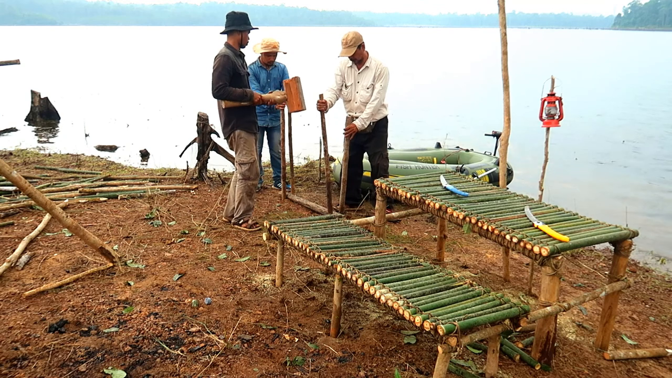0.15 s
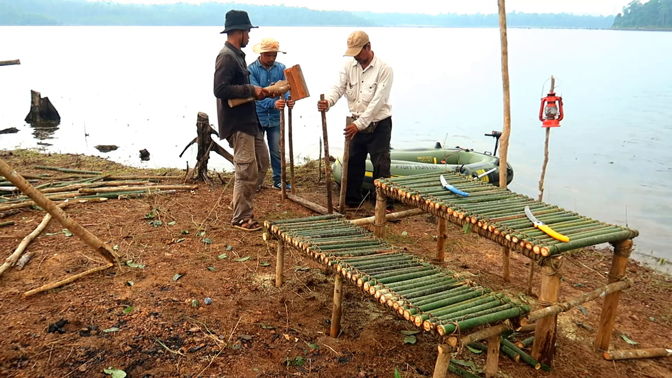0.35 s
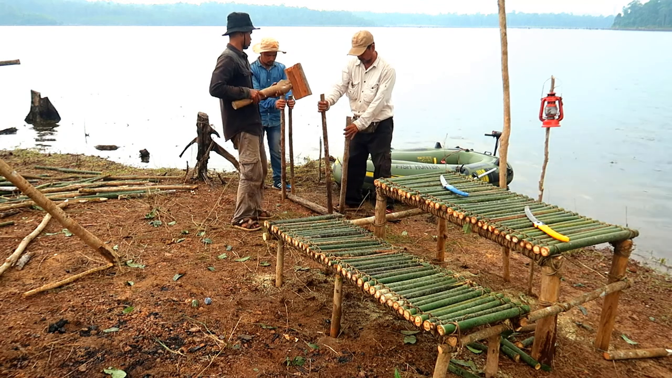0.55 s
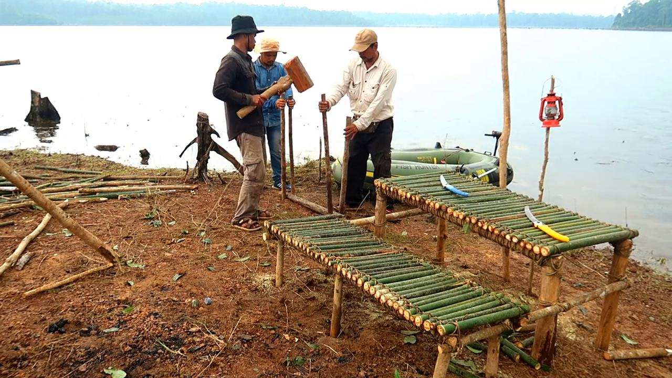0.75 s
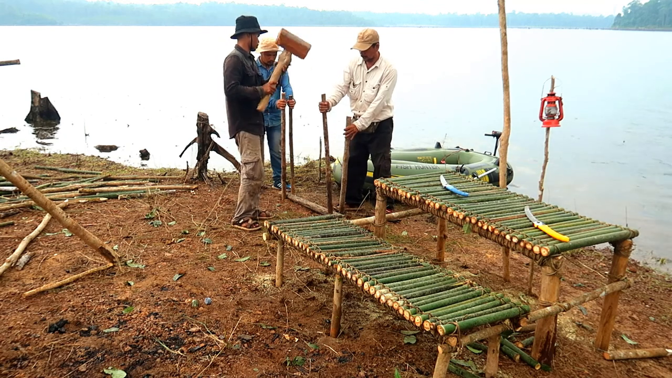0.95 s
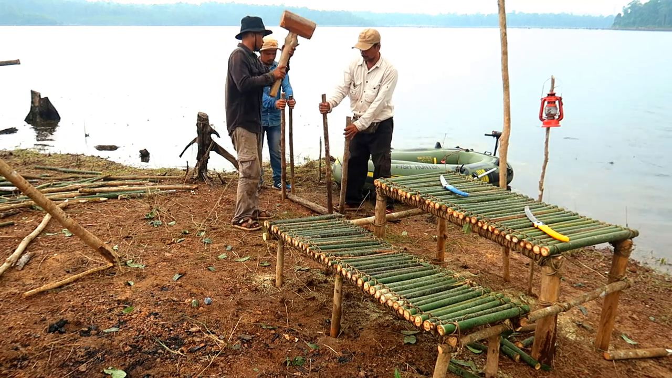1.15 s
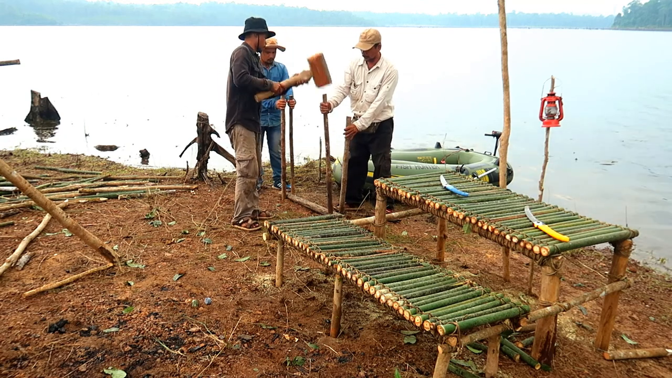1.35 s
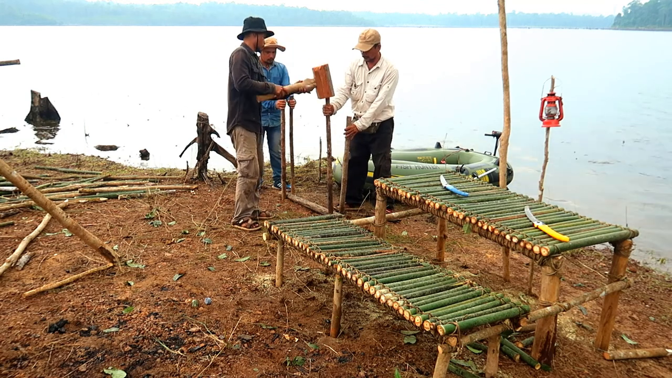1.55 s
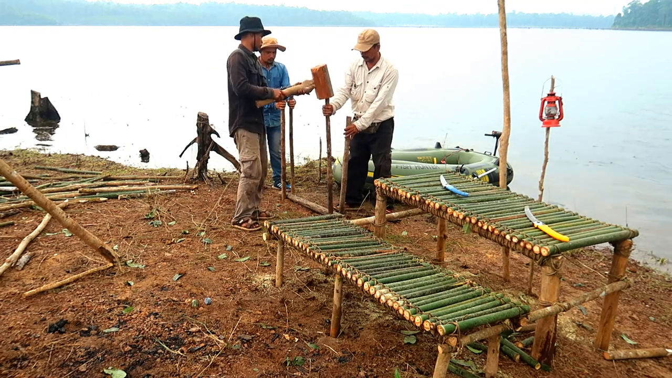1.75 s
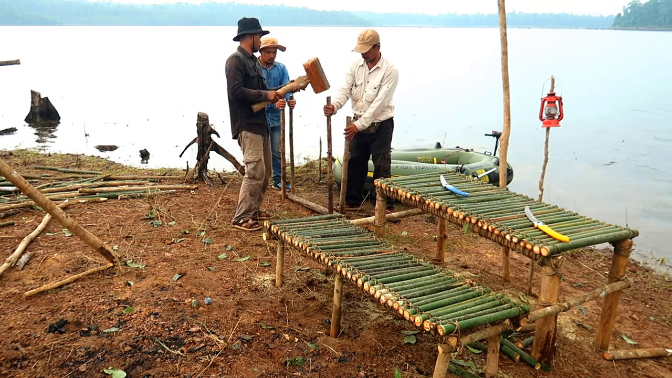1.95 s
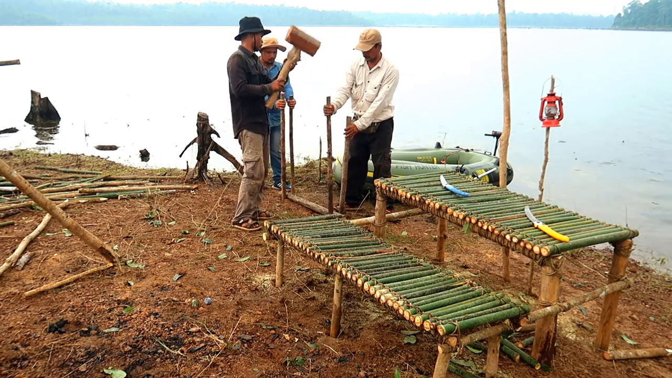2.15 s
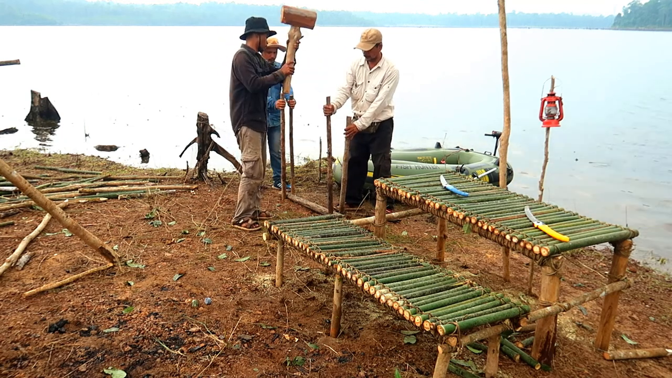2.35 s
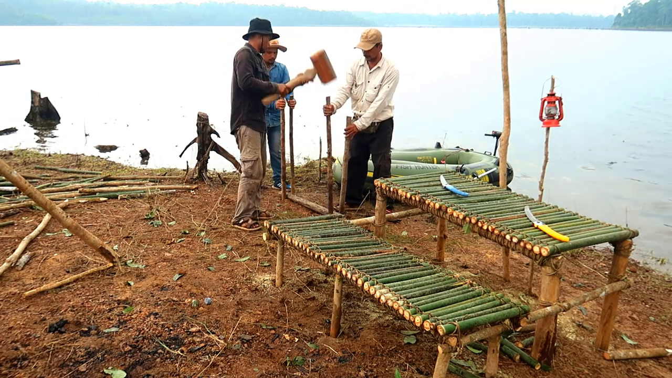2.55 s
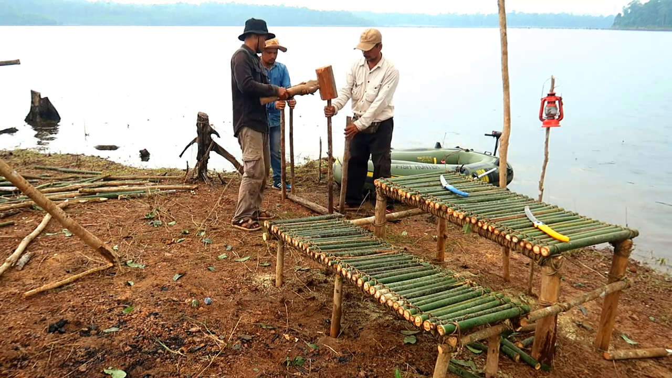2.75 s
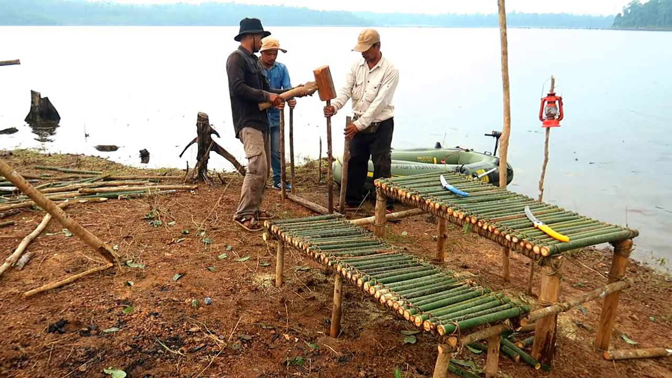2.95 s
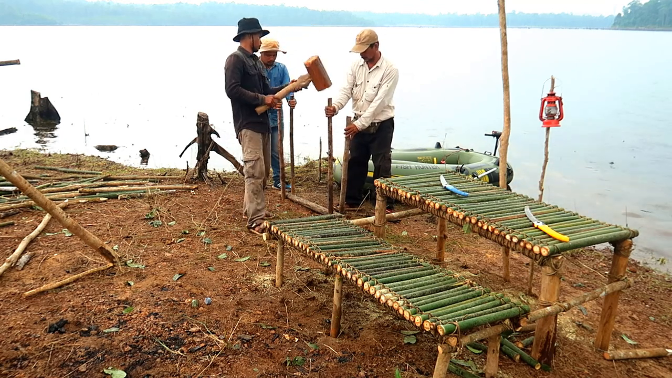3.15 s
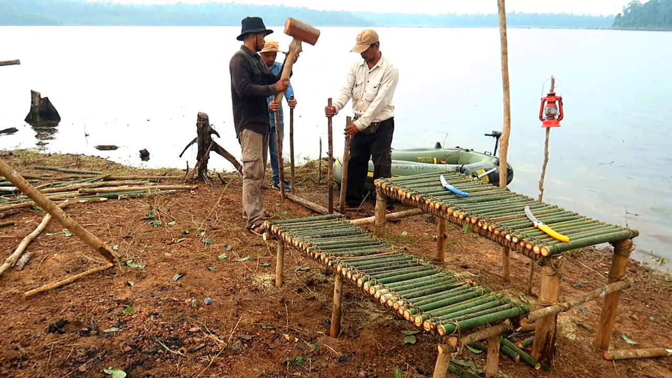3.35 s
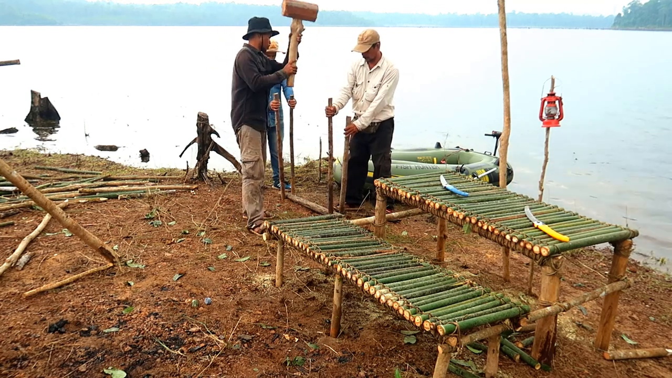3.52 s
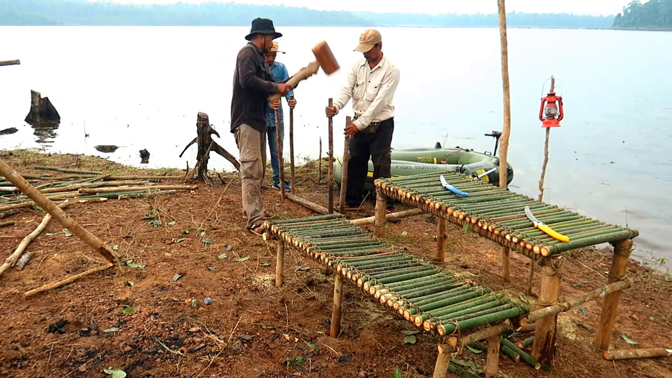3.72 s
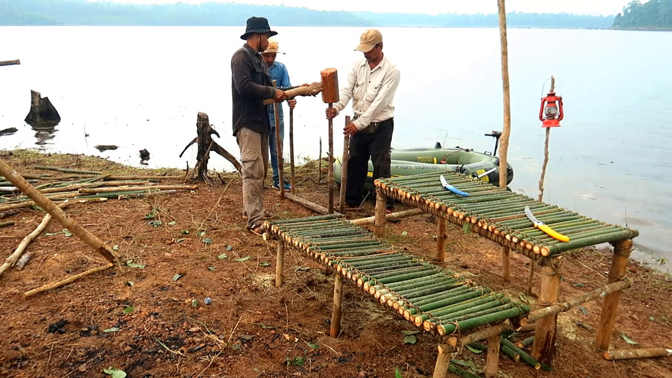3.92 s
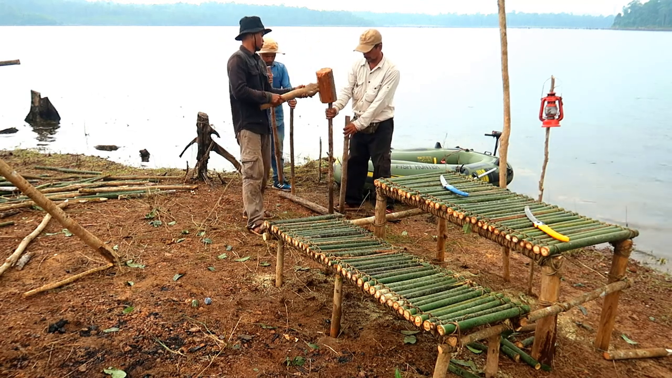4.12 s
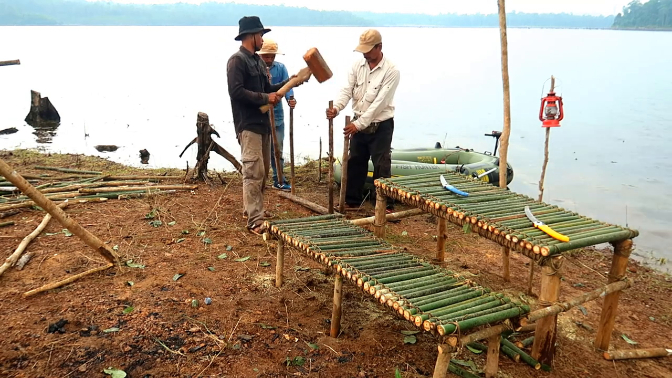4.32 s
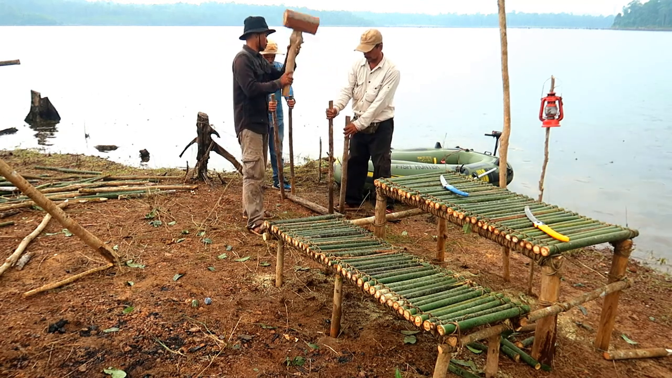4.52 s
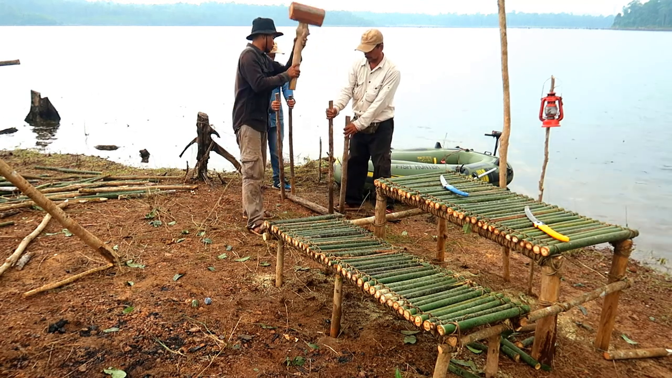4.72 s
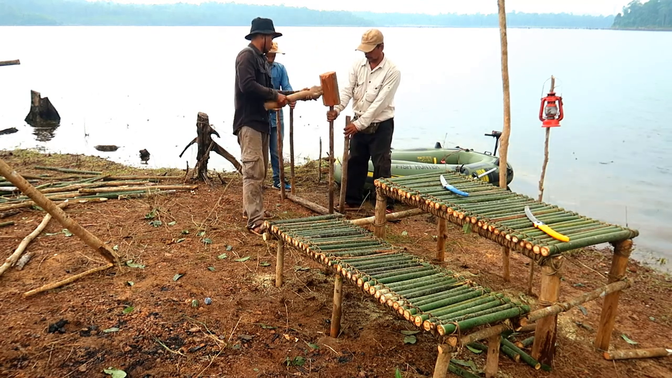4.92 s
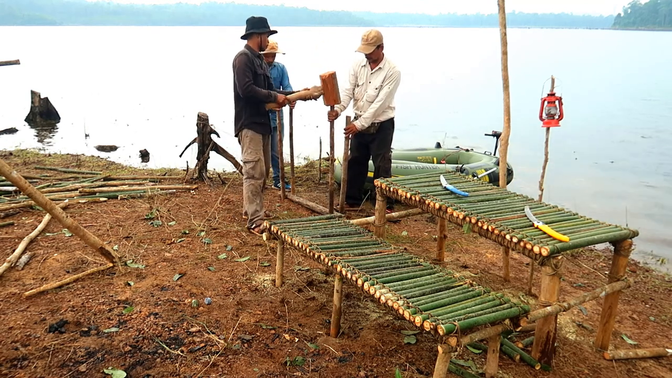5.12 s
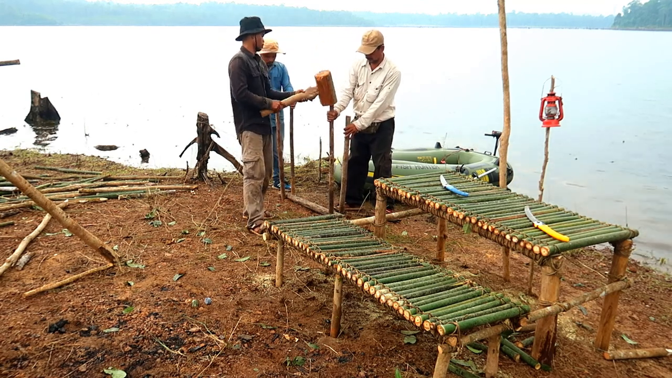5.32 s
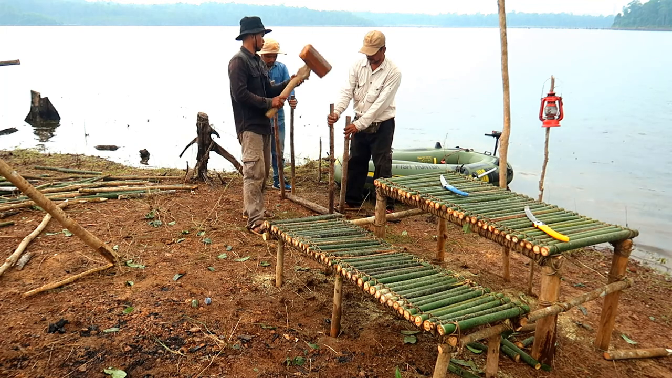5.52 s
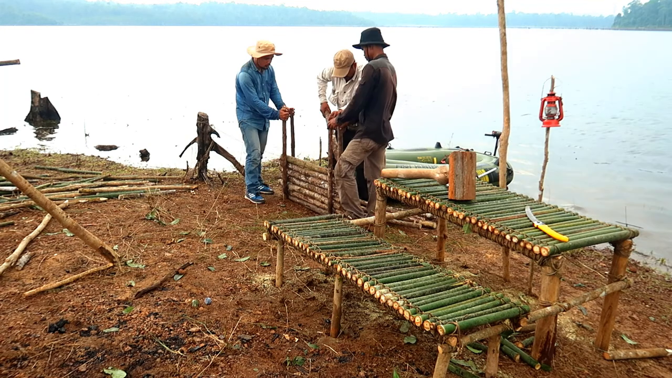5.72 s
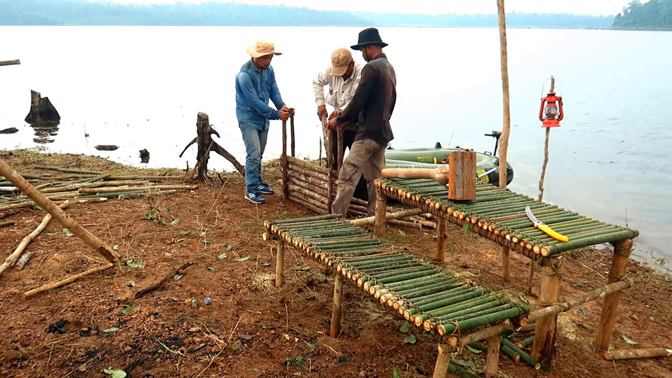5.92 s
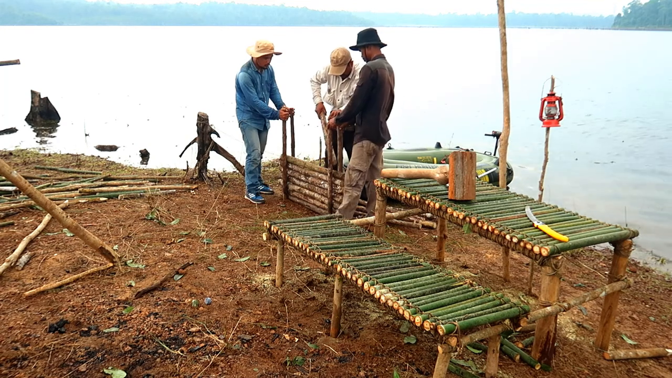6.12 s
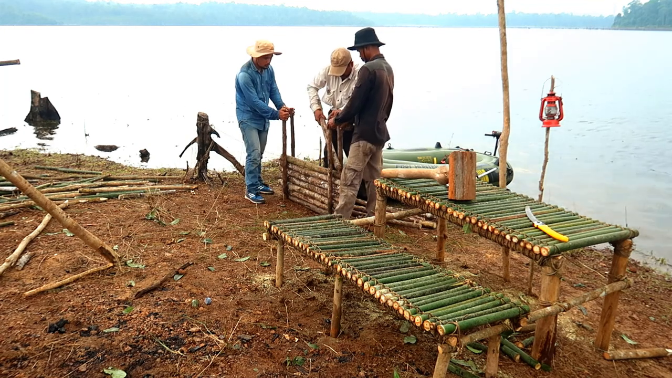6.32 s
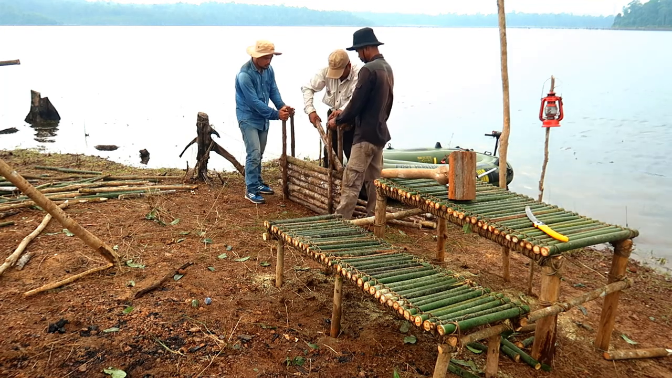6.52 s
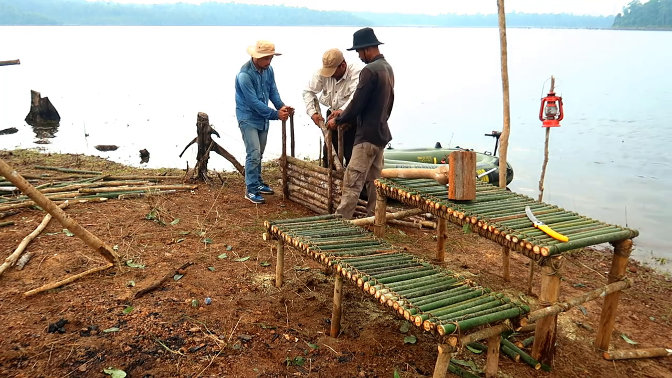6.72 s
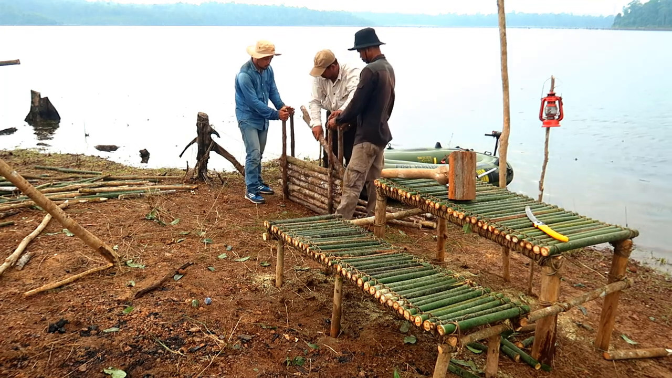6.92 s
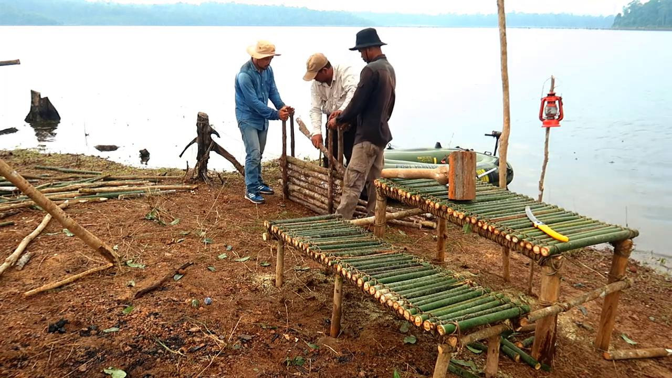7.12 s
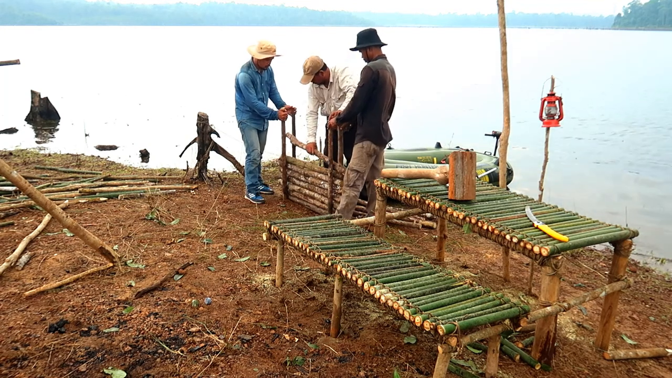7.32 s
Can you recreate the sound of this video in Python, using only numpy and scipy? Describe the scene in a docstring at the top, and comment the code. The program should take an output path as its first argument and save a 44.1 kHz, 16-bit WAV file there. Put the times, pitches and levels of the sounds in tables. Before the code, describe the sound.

A wooden mallet strikes a stake four times, about 1.2 seconds apart, each a hard, short woody crack with a low thump. A lighter glancing hit falls just before the last blow. Then a dull foot thud, shuffling, a soft hollow pole knock, scrapes and a tiny twig snap. A small bird chirps in falling runs; an insect drones over soft shore hiss. Open air, moderately close microphone.

```python
"""Driving a stake by a quiet lake

A wooden mallet drives a stake into the earth: four blows, each a burst of crushed fibres, a short push and
ringing wood, with a glancing one between the third and the fourth. Feet thud and shuffle, and poles are
knocked and rubbed into place. A small bird repeats runs of falling whistled chirps, a pulsing tone drones
like an insect, filtered noise makes the shore's hiss and the breeze's rumble, and gain control ducks
everything after loud sounds."""
import sys
import numpy as np
from scipy import signal
from scipy.fft import rfft, irfft
from scipy.io import wavfile
from scipy.ndimage import uniform_filter1d

SR = 44100
rng = np.random.default_rng(int(sys.argv[2]) if len(sys.argv) > 2 else 0)


def int16_out(signal):
    """Quantize to a 16-bit WAV file."""
    q = np.round(np.clip(np.atleast_2d(signal).T, -1, 1) * 32767)
    wavfile.write(sys.argv[1], SR, q.astype(np.int16))


N = 324752

# How alike left and right are in the open air. Each row: frequency in Hz, correlation from -1 to 1.
AIR_LIKENESS = [(50, .92), (90, 0.96), (140, 0.93), (220, 0.15), (600, -0.22), (2500, -0.19),
                (6000, -0.099), (12000, -0.16)]
# The same for scatter and close sounds. Each row: frequency in Hz, correlation from -1 to 1.
CLOSE_LIKENESS = [(100, 1), (500, 1), (1500, 1), (4000, 1), (10000, 0.5)]
# Spectrum of earth giving way. Each row: frequency in Hz, relative level in dB per Hz.
SOIL_SPECTRUM = [(40, 5), (100, 15.5), (170, 5.5), (330, -7), (600, -32), (1500, -42), (6000, -65)]


def amp(db):
    """Decibels to gain."""
    return 10 ** (np.asarray(db) / 20)


def unit(x):
    """Scales to rms 1."""
    return x / np.sqrt(np.mean(x ** 2) + 1e-20)


def read(points, hz):
    """Reads a curve of (Hz, value) points on a log-frequency axis."""
    f, value = np.transpose(points)
    return np.interp(np.log(hz + 1), np.log(f + 1), value)


def follow(curve):
    """Turns a level curve of (seconds, dB) points into a gain for every sample."""
    return amp(np.interp(np.arange(N) / SR, *np.transpose(curve)))


def add(mix, s, sound):
    """Mixes a sound in at s seconds, trimming whatever falls outside."""
    at = round(s * SR)
    sound = sound[..., max(-at, 0):]
    part = mix[:, max(at, 0):][:, :sound.shape[-1]]
    part += sound[..., :part.shape[1]]


def fade(t, t60):
    """Exponential decay by 60 dB in t60 seconds."""
    return np.exp(-np.log(1000) * t / t60)


def noise(spectrum, size, tilt=0, likeness=AIR_LIKENESS):
    """Coloured stereo noise: the shares of mid and side set how alike the channels are at each frequency."""
    hz = np.fft.rfftfreq(size, 1 / SR)
    mid, side = rfft(rng.standard_normal((2, size)))
    same = np.clip(read(likeness, hz), -.999, .999)
    opposite_signs = np.array([[1], [-1]])
    pair = mid * np.sqrt(1 + same) + opposite_signs * side * np.sqrt(1 - same)
    level_db = read(spectrum, hz) + tilt * np.log2(1 + hz / 200)
    return unit(irfft(pair * amp(level_db), size))


def tone(hz, width):
    """A narrow, wavering band of noise, at half amplitude width / 2 Hz either side of its centre."""
    f = np.fft.rfftfreq(N, 1 / SR)
    return unit(irfft(rfft(rng.standard_normal(N)) / (1 + (2 * (f - hz) / width) ** 2), N))


def pulse(spectrum, size=4096):
    """The most compact causal pulse with this spectrum (minimum phase)."""
    log_gain = np.log(amp(read(spectrum, abs(np.fft.fftfreq(size, 1 / SR)))))
    minimum_phase = np.exp(np.conj(signal.hilbert(log_gain)))
    return np.fft.ifft(minimum_phase).real[:size // 2]


def ring(modes, pitch, rise, t):
    """Damped modes; along a pole, neighbouring modes swing in opposite senses."""
    longest_cycles = 28  # caps each t60, counted at the mode's frequency before the pitch factor
    swing = 0
    for k, (hz, db, t60) in enumerate(modes):
        decay = fade(t, min(t60, longest_cycles / hz))
        swing = swing + (-1) ** k * amp(db) * decay * np.sin(2 * np.pi * hz * pitch * t)
    return swing * (1 - np.exp(-t / rise))


def outdoors(sound, delay=0.0023):
    """Adds the short scatter of an open place: noise that swells within milliseconds and dies band by band."""
    # Scatter from the ground, benches and people. Each row: frequency in Hz, relative level in dB.
    scatter_spectrum = [(60, -10.5), (130, -23), (300, -25), (600, -10.5), (1200, -16), (2000, -12),
                        (3300, -12.5), (6000, -12), (12000, -14.5)]
    # How long the scatter lasts. Each row: frequency in Hz, t60 in seconds.
    scatter_t60 = [(70, 0.24), (200, 0.19), (600, 0.12), (2500, 0.115), (5000, 0.084), (12000, 0.038)]
    white = noise([(20, 0), (20000, 0)], size=SR // 2, likeness=CLOSE_LIKENESS)
    hz, t, bands = signal.stft(white, SR, nperseg=256)
    t60 = read(scatter_t60, hz)[:, None]
    unit_energy = np.sqrt(2 * np.log(1000) / (t60 * SR))
    bands = bands * fade(t, t60) * amp(read(scatter_spectrum, hz))[:, None] * unit_energy
    tail = signal.istft(bands, SR, nperseg=256)[1]
    tail *= 1 - np.exp(-(np.arange(tail.shape[1]) / SR / delay) ** 2)
    tail[:, 0] += 1  # direct sound
    return signal.fftconvolve(np.atleast_2d(sound), tail, axes=1)


def place(pair, lag, right_db):
    """Direction: delays the left channel by lag seconds and makes the right one right_db louder than it."""
    spectra = rfft(pair)
    spectra[0] *= np.exp(-2j * np.pi * np.fft.rfftfreq(N, 1 / SR) * lag)
    return irfft(spectra, N) * amp([[-right_db / 2], [right_db / 2]])


def hiss(level_db=-56, swell_db=-0.5):
    """Water and trees: steady, wide noise whose loudness slowly swells."""
    # Spectrum of the shore. Each row: frequency in Hz, relative level in dB per Hz.
    shore_spectrum = [(59, -32.5), (100, -2), (123, -9), (353, -11.5), (425, -11.5), (592, -16.5),
                      (824, -16), (1730, -20), (2680, -22.5), (2910, -23), (4130, -27), (5190, -28),
                      (5870, -30), (11600, -39), (14000, -64)]
    swell = amp(swell_db * tone(hz=0.77, width=4.0))
    return amp(level_db) * noise(shore_spectrum, size=N) * swell


def breeze(gust_db=1.55):
    """Wind at the microphone: low rumbling noise that follows the gusts and flutters quickly on top."""
    # Strength of the breeze before the flutter. Each row: time in seconds, level in dB.
    strength = [(0, -49.5), (.72, -54), (.95, -41.5), (1.1, -57), (1.85, -47), (2.1, -54), (2.56, -46),
                (3.1, -57), (4.55, -51), (4.8, -63), (5.55, -65.5), (5.8, -49), (6.7, -52), (7.36, -66)]
    # Spectrum of the rumble. Each row: frequency in Hz, relative level in dB per Hz.
    rumble_spectrum = [(15, -8), (30, -1), (52, 3), (80, -1), (120, -25), (200, -29.5), (400, -76)]
    flutter = amp(gust_db * tone(hz=6, width=4.3))
    return follow(strength) * flutter * noise(rumble_spectrum, size=N)


def throb(per_s=7.3, uneven=0.386, wander_db=2.0, dip_db=-5):
    """The insect's pulsing: a wandering loudness with a short dip after each uneven pulse."""
    beats = np.cumsum(per_s * (1 + uneven * tone(hz=1, width=5))) / SR
    return amp(wander_db * tone(hz=1, width=24) + dip_db * np.sin(np.pi * beats) ** 4)


def insect(level_db=-2, overtone_db=-13, pitch_hz=2818, waver_hz=12):
    """A droning insect: a wavering, pulsing sine plus a narrow band of noise an octave above."""
    # The drone's course, before level_db trims it. Each row: time in seconds, level in dB.
    course = [(0, -65.5), (.8, -65.5), (2.2, -69), (2.6, -65), (3.2, -68), (4.6, -67.5), (5.3, -74.5),
              (7.36, -81.5)]
    turns = np.cumsum(pitch_hz + waver_hz * tone(hz=1, width=86)) / SR
    voice = unit(np.sin(2 * np.pi * turns) * throb())
    voice = voice + amp(overtone_db) * tone(2 * pitch_hz, width=110)
    return amp(level_db) * follow(course) * voice


def far_hums():
    """Faint far-off hums: narrow bands of noise."""
    # Each row: frequency in Hz, width in Hz, level in dB.
    hums = [(350.6, 13, -78.5), (603.5, 43, -72)]
    return sum(amp(db) * tone(hz, width) for hz, width, db in hums)


def chirp(start_hz, end_hz, length):
    """A gliding whistle that swells quickly, loudest a quarter of the way in, and dies away."""
    u = np.linspace(0, 1, round(length * SR))
    hz = start_hz + (end_hz - start_hz) * u
    whistle = np.sin(2 * np.pi * np.cumsum(hz) / SR)
    return outdoors(np.sin(np.pi * np.sqrt(u)) ** 2 * whistle)


def birds(top_hz=5530, fall_hz=800, length=0.029, gap=.0505, softer_db=7, lower_hz=12,
          lead_gap=.028, lead_db=-4.5, last_db=-56.5):
    """Each run opens with two quick, faint notes, then its falling chirps grow louder and higher."""
    # Each row: time of the last chirp's peak in seconds, number of chirps.
    runs = [(.141, 4), (.958, 4), (1.831, 4), (2.654, 5), (3.473, 4), (4.395, 4), (5.292, 4), (6.206, 4),
            (7.073, 4)]
    # Faint gliding peeps. Each row: start in seconds, level in dB, start in Hz, end in Hz, length in seconds.
    peeps = [(5.192, -55.5, 1420, 1240, 0.023), (5.251, -62.5, 2850, 3470, .035),
             (5.381, -60, 2505, 3920, .042)]
    out = np.zeros((2, N))
    for s, count in runs:
        for back in range(round(count)):  # from the last chirp back to the first
            hz = top_hz - lower_hz * back ** 2 + rng.normal(0, 20)
            start = s - back * gap - length / 4
            note = amp(last_db - softer_db * (back / count) ** 2) * chirp(hz, hz - fall_hz, length)
            add(out, start, note)
        for lead in range(1, 3):  # faint copies ahead of the first chirp
            add(out, start - lead * lead_gap, amp(lead * lead_db) * note)
    for s, db, *glide in peeps:
        add(out, s, amp(db) * chirp(*glide))
    return out


def rub(db, rise, peak_db, t60, tilt, hz, t, grain_db=1.0, sharpness=16):
    """Uneven grains of friction swell and die, coloured by one resonance of the rubbed wood."""
    # Spectrum of bark, before the tilt. Each row: frequency in Hz, relative level in dB per Hz.
    bark_spectrum = [(100, 0), (400, 9.5), (900, 3), (1500, -1), (3000, 1), (5000, -4), (9000, -8),
                     (14000, -23)]
    roughness = unit(uniform_filter1d(rng.standard_normal(len(t)), size=60))
    grains = unit(amp(grain_db * roughness))
    friction = grains * noise(bark_spectrum, size=len(t), tilt=tilt, likeness=CLOSE_LIKENESS)
    resonance = signal.lfilter(*signal.iirpeak(hz, sharpness, SR), friction)
    friction = friction + (amp(peak_db) - 1) * resonance
    return amp(db) * unit(friction) * np.minimum(t / rise, 1) * fade(np.maximum(t - rise, 0), t60)


def rubs(strokes, rise, peak_db):
    """Lays out strokes of friction that share one rise in seconds and one height of resonance."""
    out, t = np.zeros((2, N)), np.arange(SR // 2) / SR
    for s, db, *stroke in strokes:
        add(out, s, rub(db, rise, peak_db, *stroke, t))
    return out


def scrapes():
    """Wood rubbing on wood and soil: friction that swells, then dies away."""
    # Each row: start in seconds, level in dB, t60 in seconds, tilt in dB per octave, resonance in Hz.
    strokes = [(.09, -56, 0.42, -2.5, 3380), (0.595, -54, 0.12, -3.5, 3320), (4.508, -44, 0.14, -2.5, 2420),
               (5.988, -48, 0.12, -4.5, 430), (6.15, -53.5, 0.15, -2.5, 1440), (6.352, -53, 0.074, -4, 505),
               (6.42, -49.5, 0.11, -1.5, 1420), (6.888, -47, 0.25, -1.5, 434),
               (6.975, -54.5, 0.78, -2.5, 465)]
    return rubs(strokes, rise=0.023, peak_db=12.5)


def mallet(crush_db=-21, crush_t60=0.03, crush_rise=0.0005, push_db=23, push_delay=0.00163):
    """Each blow crushes fibres, pushes the stake and rings the wood; the spot it lands on sets the colour."""
    # Each row: start in seconds, level in dB, pitch factor, then the colour as dB of thud, hollow ring,
    # tock, clack, rap, crack and fizz.
    blows = [(1.4745, 0.5, 1.01, 2.5, 4, 2.5, 5, 1, 8.5, -1),
             (2.6806, 5, 0.97, 3.1, 0.1, -1.5, 3, -2.7, -6.5, -3.8),
             (3.8539, 5, .99, 6.8, -0.5, -9, 4, -1.8, 1.5, -5),
             (4.9734, 5, 0.97, 7.7, 0.5, 1, 1, 0.34, -4, -6.5)]
    # Where these seven colours lie, in Hz.
    colour_hz = [300, 560, 950, 1450, 2100, 3200, 5500]
    # Mallet, stake and the earth under it ringing together, before the pitch factor and colour.
    # Each row: frequency in Hz, level in dB, t60 in seconds.
    wood_modes = [(52.5, -40.5, 0.26), (73, -50, 0.2), (143.4, -26, 0.075), (219.3, -19.5, 0.033),
                  (313, -16.5, 0.031), (381, -14.5, 0.041), (538, -11.5, 0.045), (596, -9.5, 0.024),
                  (726, -18.5, 0.063), (790, -46, 0.023), (960, -23, 0.068), (1115, -11, 0.055),
                  (1434, -15.5, .03), (1565, -29.5, 0.028), (2076, -11, 0.025), (2670, -20.5, 0.021),
                  (3150, -29.5, 0.0048), (4300, -31.5, 0.005)]
    # Fibres crushing under the mallet face. Each row: frequency in Hz, relative level in dB per Hz.
    crush_spectrum = [(200, -12.5), (800, 1.5), (1750, -2), (2300, 0.5), (3200, -3), (4000, -7.5),
                      (6500, -8), (8000, -19), (11000, -26), (14000, -42.5)]
    # The short push of the mallet head. Each row: frequency in Hz, relative level in dB.
    push_spectrum = [(40, -26), (90, -18.5), (160, 1), (320, 1), (480, -25.5), (800, -0.5), (1050, 3),
                     (1300, -8), (1800, -23), (3000, -25), (8000, -41), (14000, -57.5)]
    out, t = np.zeros((2, N)), np.arange(SR // 4) / SR
    for s, db, pitch, *colour in blows:
        grit = noise(crush_spectrum, size=len(t), likeness=CLOSE_LIKENESS)
        blow = grit * amp(crush_db) * fade(t, crush_t60) * (1 - np.exp(-t / crush_rise))
        blow += ring(wood_modes, pitch, t=t, rise=0.0013)
        add(blow, push_delay, amp(push_db) * pulse(push_spectrum))
        spot = pulse(list(zip(colour_hz, colour)))
        blow = signal.fftconvolve(blow, spot[None], axes=1)
        add(out, s, amp(db) * outdoors(blow))
    return out


def grazes():
    """Wood grazing the stake with a hard edge: friction that starts at once."""
    # Each row: start in seconds, level in dB, t60 in seconds, tilt in dB per octave, resonance in Hz.
    strokes = [(3.1754, -50, 0.15, -3.5, 2170), (4.502, -34, 0.09, -5.5, 3180),
               (4.5234, -29, 0.048, -0.5, 1480), (6.935, -54, .08, 3, 1000),
               (6.964, -56.5, .08, -0.5, 3470)]
    return rubs(strokes, rise=.001, peak_db=8)


def thuds(rise=0.0025, soil_db=-8, heel_db=-13.5, heel_ratio=2.18, heel_t60=0.062):
    """Dull thuds in the earth: a low damped mode, a brief higher knock and a burst of soil noise."""
    # Each row: start in seconds, level in dB, frequency in Hz before the pitch factors below, t60 in seconds.
    impacts = [(4.502, -30.5, 193, 0.077), (4.527, -31, 198, 0.09), (5.658, -23.5, 90.8, 0.13),
               (5.786, -38.5, 105, 0.33), (5.836, -40, 200, 0.17), (5.996, -29.5, 208, 0.041),
               (6.183, -36.5, 90, 0.18), (6.708, -38.5, 122, 0.089)]
    out, t = np.zeros((2, N)), np.arange(SR // 2) / SR
    for s, db, hz, t60 in impacts:
        grit = noise(SOIL_SPECTRUM, size=len(t), likeness=CLOSE_LIKENESS)
        soil = amp(db + soil_db) * grit * fade(t, t60) * (1 - np.exp(-t / rise))
        ground = ring([(hz, db, t60)], 0.93, rise, t)
        heel = ring([(hz * heel_ratio, db + heel_db, heel_t60)], 0.853, rise, t)
        add(out, s, outdoors(ground + heel + soil))
    return out


def knocks():
    """Soft knocks of wood on wood: the damped modes of a loose pole."""
    # Each row: start in seconds, level in dB, pitch factor.
    hits = [(4.5026, -34, 0.64), (6.004, -59, 0.99), (6.177, -21, 0.99)]
    # The pole, before the pitch factor. Each row: frequency in Hz, relative level in dB, t60 in seconds.
    pole_modes = [(292, -8, 0.14), (517, 1.5, 0.1), (573, -6, 0.096), (756, 2, 0.017), (990, -12.5, 0.023),
                  (1260, -11.5, 0.016)]
    out, t = np.zeros((2, N)), np.arange(SR // 2) / SR
    for s, db, pitch in hits:
        add(out, s, amp(db) * outdoors(ring(pole_modes, pitch, t=t, rise=0.0042)))
    return out


def shuffles():
    """Feet shifting their weight on the soil: low noise that swells and sinks once."""
    # Each row: start in seconds, level in dB, length in seconds.
    steps = [(5.723, -45.5, 0.1), (6.069, -46.5, 0.24), (6.319, -47.5, .12)]
    out, t = np.zeros((2, N)), np.arange(SR // 2) / SR
    for s, db, length in steps:
        soil = noise(SOIL_SPECTRUM, size=len(t), likeness=CLOSE_LIKENESS)
        add(out, s, amp(db) * soil * np.sin(np.pi * np.minimum(t / length, 1)))
    return out


def twig_snap(s=6.8015, peak_db=-25.5):
    """A twig snaps: one compact, bright pulse."""
    # Each row: frequency in Hz, relative level in dB per Hz.
    twig_spectrum = [(500, -17), (2000, -11), (3200, -3), (5000, 4), (7800, -3), (10000, -16), (14000, -25)]
    out = np.zeros((2, N))
    snap = pulse(twig_spectrum)
    add(out, s, amp(peak_db) * outdoors(snap / abs(snap).max()))
    return out


def scene():
    """The work stands a little right of centre, the birds to the left, the shore all around."""
    shore = hiss() + breeze() + insect() + far_hums()
    handling = scrapes() + grazes() + thuds() + knocks() + shuffles() + twig_snap()
    work = place(mallet() + handling, lag=.000018, right_db=0.44)
    return work + place(birds(), lag=-0.000027, right_db=-1.5) + shore


def record(dry, threshold_db=-25, slope=0.19, recovery_db=36, ceiling=.7, edge_hz=14500):
    """Gain control falls quickly and recovers slowly; peaks that slip past are rounded off; then a low-pass."""
    power_db = 10 * np.log10(abs(uniform_filter1d((dry ** 2).mean(0), size=200)) + 1e-12)
    fall = np.arange(N) * recovery_db / SR  # the held level sinks by recovery_db per second
    held_db = np.maximum.accumulate(power_db + fall) - fall
    over_db = np.maximum(held_db - threshold_db, 0)
    ducked = dry / amp(slope * uniform_filter1d(over_db, size=100))
    rounded = ducked / (1 + (ducked / ceiling) ** 4) ** .25
    low_pass = signal.firwin(255, edge_hz, window=("kaiser", 9), fs=SR)
    return signal.oaconvolve(rounded, low_pass[None], "same")


dry = scene()
out = record(dry)
int16_out(out)
```